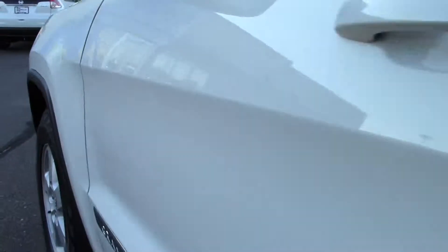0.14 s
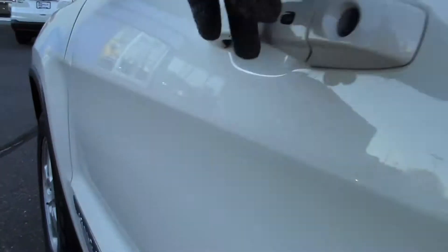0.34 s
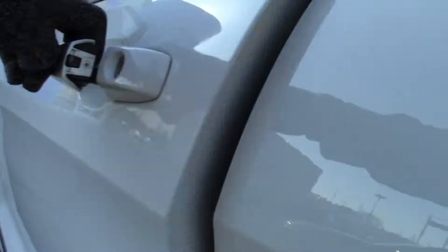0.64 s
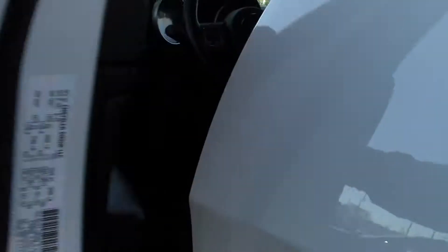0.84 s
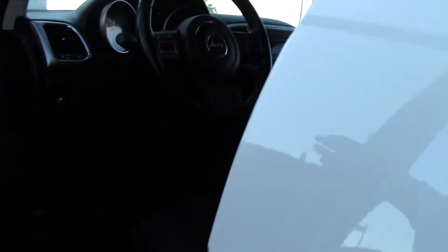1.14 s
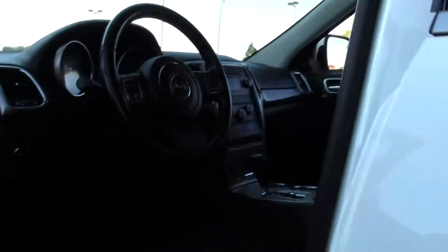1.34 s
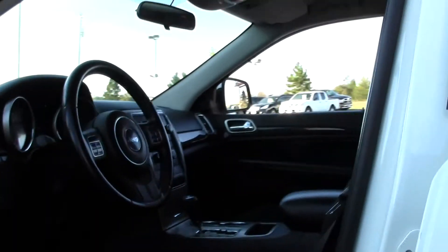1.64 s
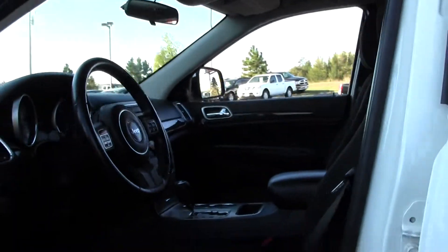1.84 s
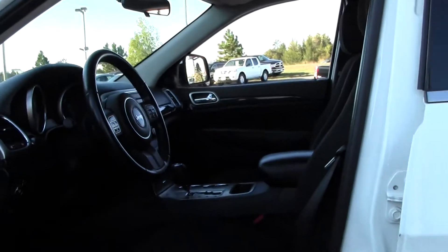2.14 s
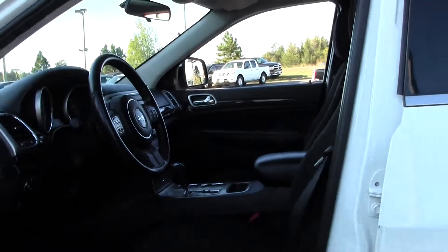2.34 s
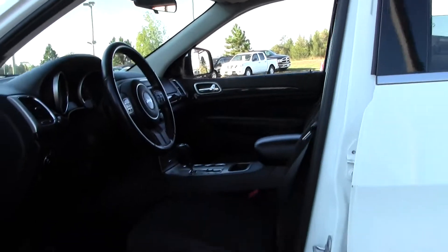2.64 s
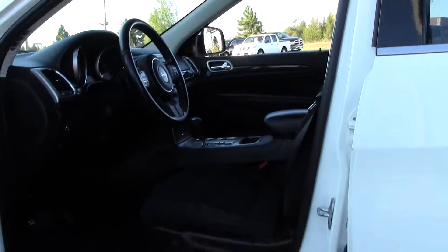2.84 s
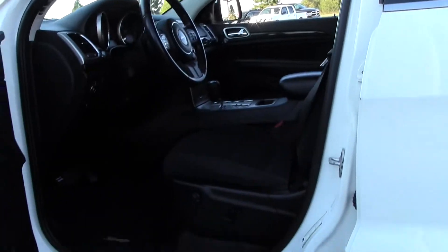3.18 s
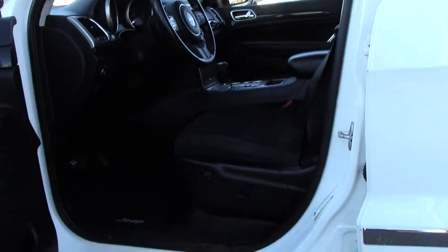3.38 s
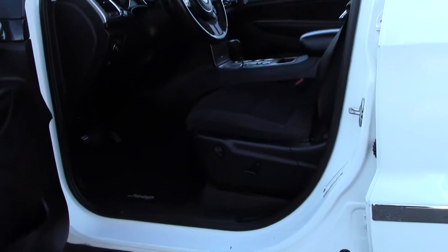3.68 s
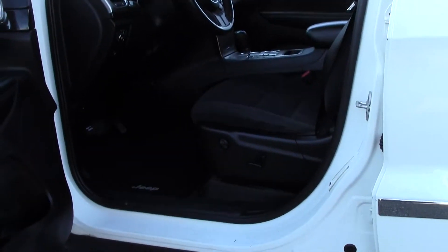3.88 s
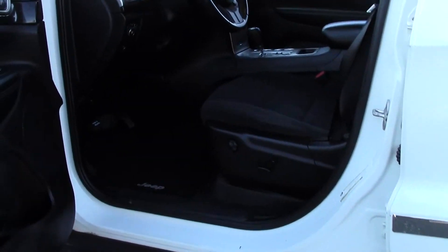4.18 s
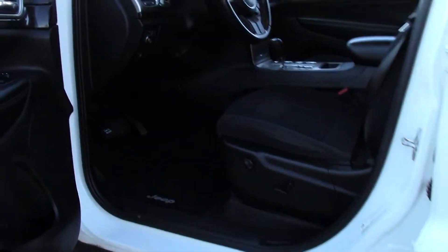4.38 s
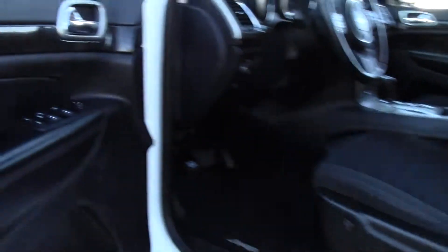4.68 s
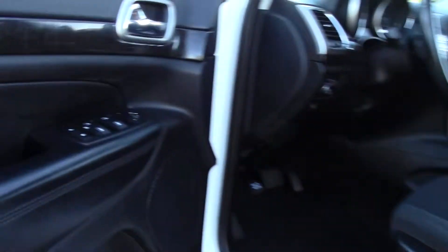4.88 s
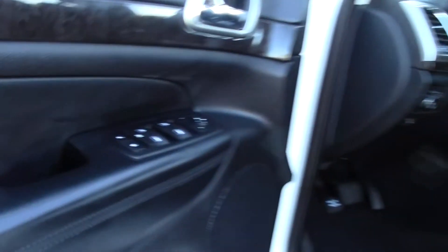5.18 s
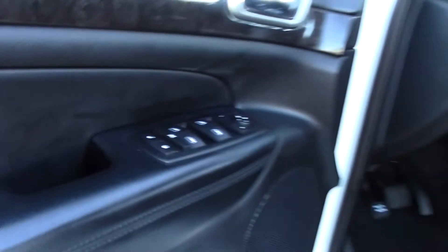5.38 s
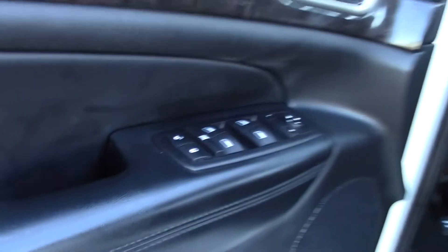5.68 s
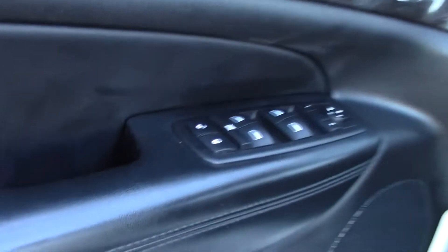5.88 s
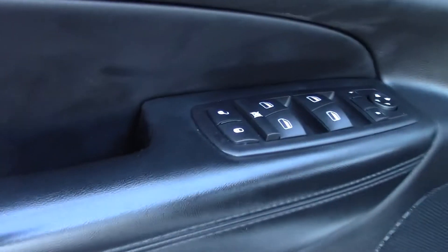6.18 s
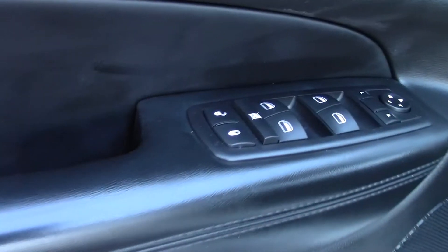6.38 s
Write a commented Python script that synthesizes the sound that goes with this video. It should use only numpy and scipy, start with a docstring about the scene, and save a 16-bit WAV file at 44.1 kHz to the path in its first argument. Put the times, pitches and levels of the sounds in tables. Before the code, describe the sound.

Close car door opening: handle clunk, latch pop and hollow panel thud, then small ticks under rumbling gusts and faint distant road drone.

```python
"""A car door is opened outdoors, close by, in gusts that buffet the microphone from start to end, strongest late on.
First the handle is pulled: its linkage clacks and snaps back as blows that excite damped modes. A second into
the scene the latch lets go and the door panel booms, again by modes over a dense clatter. Small parts tick as
damped notes with spits of noise; a sleeve brushes as grainy band noise. Near the end a far car's firing note falls.
Throughout, a road drones far away (coloured noise), a low hum wavers (three tones) and the two channels hiss."""
import sys
import numpy as np
from scipy import signal
from scipy.fft import rfft, irfft, next_fast_len
from scipy.io import wavfile
from scipy.ndimage import uniform_filter1d, map_coordinates

SR = 44100
rng = np.random.default_rng(int(sys.argv[2]) if len(sys.argv) > 2 else 0)


def dump_mix(stems):
    """Bounce the given channels to the path in sys.argv[1] as a 16-bit WAV at rate SR."""
    frames = np.atleast_2d(stems).T  # one column per channel
    limited = np.clip(frames, -1, 1)  # hard clip at full scale
    pcm = np.round(limited * 32767).astype(np.int16)
    wavfile.write(sys.argv[1], SR, pcm)


N = 287576


def amp(db):
    """Level in decibels to amplitude ratio: 20 dB per factor of ten."""
    return 10 ** (np.asarray(db) / 20)


def unit(x):
    """Normalisation to an rms of 1."""
    return x / np.sqrt(np.mean(x ** 2) + 1e-20)


def along(points, hz, order=1):
    """Interpolation of one column of (frequency, value, ..) points on a logarithmic frequency axis."""
    cols = np.transpose(points)
    return np.interp(np.log(hz + 1), np.log(cols[0] + 1), cols[order])


def curves(rows):
    """Linear interpolation in time: one value per sample for each column after the time."""
    s, *cols = np.transpose(rows)
    return [np.interp(np.arange(N) / SR, s, c) for c in cols]


def wobble(rate):
    """Slow random modulation: a smooth spline through random knots, rate of them per second."""
    knots = rng.standard_normal(int(N * rate / SR) + 4)
    return map_coordinates(knots, [np.arange(N) * rate / SR])


def filtered(x, response):
    """Linear filtering: the spectrum of x is multiplied by a response of frequency."""
    m = next_fast_len(x.shape[-1] + 8192)  # padding keeps the filter's tail from wrapping round
    spectrum = rfft(x, m) * response(np.fft.rfftfreq(m, 1 / SR))
    return irfft(spectrum, m)[..., :x.shape[-1]]


def noise(spectrum, channels=1):
    """Coloured noise of rms 1: white noise shaped by a spectral density."""
    white = rng.standard_normal((channels, N))
    return unit(filtered(white, lambda hz: amp(along(spectrum, hz))))


def bell(f, hz, spread):
    """Band-pass response: a Gaussian in log frequency around hz."""
    return np.exp(-(np.log((f + 1) / hz) / spread) ** 2)


def add(track, s, sound):
    """Superposition: mixes a sound into the track at time s."""
    part = track[round(s * SR):][:len(sound)]
    part += sound[:len(part)]


def door():
    """Impact excitation of two resonators: the handle with its rods, then the latch and the panel."""
    # blows: start_s, level_db, centre_hz driven most, width_octaves of that drive
    pulls = [(.345, -42.5, 500, 1.2), (.531, -35.5, 780, 0.67), (.567, -32, 586, 0.55),
             (.578, -33.5, 350, 0.98), (.6225, -26, 2190, 1.6), (.6265, -21, 450, 1.1),
             (.632, -20, 430, 1.3), (.646, -35.5, 600, 1.6), (.6645, -34, 1990, 1.4),
             (.680, -46, 2000, 0.46), (.690, -36.5, 397, 1.5), (.703, -38.5, 2200, 2.4),
             (.709, -45, 1500, 2.2)]
    release = [(1.0625, -39.5, 1510, 2.4), (1.069, -26.5, 1620, 1.4), (1.0765, -19.5, 1370, 1.9),
               (1.084, -28.5, 910, 2.7), (1.092, -26, 497, 1.8), (1.096, -30, 900, 0.85),
               (1.105, -28, 300, 0.65), (1.113, -36, 600, 1.2), (1.1355, -32, 296, 1.54),
               (1.166, -43.5, 1350, .6), (1.186, -38.5, 500, 1.3), (1.532, -39, 1520, 0.43)]
    # modes: frequency_hz, level_db at full drive, free_t60_s
    handle_modes = [(259, -1, 0.14), (338, -1.5, 0.076), (420, -3.5, 0.15), (617, -10, 0.2),
                    (757, 3, 0.031), (895, -7, 0.099), (1100, -10, 0.059), (1360, -28, 0.034),
                    (1890, -2, 0.092), (2140, -7, 0.074), (2950, -10, 0.042), (3320, -21, .05),
                    (4050, -14.5, 0.062), (5200, -34, 0.028)]
    panel_modes = [(116, 0.5, 0.36), (180, 5, 0.15), (259, -20, 0.12), (323, -11.5, 0.25), (382, -3, 0.13),
                   (509, -0.5, 0.058), (574, -29, 0.14), (706, -16.5, 0.013), (792, -5.5, 0.15),
                   (920, -7, 0.08), (1150, -17, 0.1), (1340, -12.5, 0.1), (1460, -8, 0.039),
                   (1840, -11.5, 0.12), (1880, -48, 0.22), (2220, -18, 0.085), (2420, -31, 0.11),
                   (3110, -16, 0.058), (3330, -22, 0.07), (4040, -12, 0.059), (5130, -21, 0.045)]
    return struck(pulls, handle_modes, clatter_db=7.5) + struck(release, panel_modes, clatter_db=10)


def struck(blows, modes, clatter_db):
    """Modal synthesis: each blow rings the modes near its drive, at slightly new strengths, over dense clatter."""
    ring_share = 0.57  # share of the free ring time that a 500 Hz blow leaves
    bright_shortens = 0.22  # power by which that share falls with the blow's frequency
    rise_s = 0.00023
    out, t = np.zeros(N), np.arange(SR // 3) / SR
    hz, level_db, t60 = np.transpose(modes)[:, :, None]
    sign = (-1) ** np.arange(len(hz))[:, None]  # neighbouring modes start in opposite directions
    for s, db, centre_hz, octaves in blows:
        share = ring_share * (500 / centre_hz) ** bright_shortens

        def drive_db(f):
            distance = np.log2((f + 20) / centre_hz) / octaves
            return np.maximum(-6 * distance ** 2, -40)

        strength_db = level_db + drive_db(hz) + 0.75 * rng.standard_normal(hz.shape)
        decay = amp(strength_db - 60 * t / (share * t60))
        ring = np.sum(decay * np.sin(2 * np.pi * hz * t) * sign, axis=0)
        dense = filtered(clatter(len(t), share), lambda f: amp(drive_db(f)))
        add(out, s, amp(db) * (ring + amp(clatter_db) * dense) * (1 - np.exp(-t / rise_s)))
    return out


def clatter(length, share):
    """Statistical mode density: countless small modes act as noise of which every band dies at its own speed."""
    # density of the small modes: frequency_hz, level_db_per_hz, free_t60_s
    dense_modes = [(100, -7, 0.098), (482, 4, 0.26), (1580, -4, 0.16), (4070, -18.5, 0.22),
                   (8850, -22, 0.13), (15800, -58, 0.032)]
    hz, t, z = signal.stft(rng.standard_normal(length), SR, nperseg=128)
    t60 = share * along(dense_modes, hz, order=2)[:, None]
    fading_db = along(dense_modes, hz)[:, None] - 60 * t / t60
    return signal.istft(z * amp(fading_db), SR, nperseg=128)[1][:length]


def ticks():
    """Damped oscillation: loose parts tick and tap, each a short decaying note with a spit of noise."""
    # ticks and taps: start_s, level_db, pitch_hz, spread of the spit (natural log of frequency)
    tick_rows = [(.751, -55, 5930, .27), (.867, -43.5, 2760, 0.41), (1.268, -44, 2290, .3),
                 (1.350, -54, 3300, .27), (1.376, -36.5, 900, 1.26), (1.445, -31.5, 420, 0.67),
                 (1.483, -53, 5200, .5), (1.532, -34, 4520, 0.27), (1.54, -35, 3470, 0.91),
                 (1.876, -36, 800, .7), (2.478, -44.5, 3200, .6), (3.019, -34, 650, 0.55),
                 (4.787, -53, 4500, .3)]
    tick_t60_s, dull_lengthens = 0.012, 0.25  # ring time at 3000 Hz; power of its rise as pitch falls
    tone_spread = 0.34  # note strength is 1 at this spread, less for wider spits
    rise_s = 0.00036
    out, t = np.zeros(N), np.arange(SR // 10) / SR
    for s, db, hz, spread in tick_rows:
        white = rng.standard_normal(len(t))
        spit = filtered(white, lambda f: bell(f, hz, spread) * np.sqrt(hz / (f + 1)))
        note = tone_spread / spread * np.sin(2 * np.pi * hz * t)
        t60 = tick_t60_s * (3000 / hz) ** dull_lengthens
        envelope = amp(db - 60 * t / t60) * (1 - np.exp(-t / rise_s))
        add(out, s, envelope * (note + 0.7 * unit(spit)))
    return out


def brushes():
    """Friction noise: cloth drags, as grainy band noise under a bell-shaped stroke."""
    # strokes of cloth: centre_s, half_length_s (to 1/e), level_db (rms before the bell), centre_hz
    strokes = [(1.179, 0.011, -52, 1160), (1.18, .015, -64, 3950), (1.224, 0.013, -60, 2500),
               (1.69, 0.063, -65, 3450), (1.783, .03, -58, 1170), (2.163, 0.02, -56.5, 960),
               (2.37, 0.042, -64.5, 3340), (2.628, 0.014, -60, 2000), (2.73, 0.023, -59.5, 1500)]
    out, t = np.zeros(N), np.arange(N) / SR
    for s, half, db, hz in strokes:
        grains = rng.standard_normal(N) * amp(4.3 * wobble(360))
        band = filtered(grains, lambda f: bell(f, hz, 0.56))
        out += amp(db) * unit(band) * np.exp(-((t - s) / half) ** 2)
    return out


def wind():
    """Turbulent pressure on the microphone: big slow eddies thud, small fast ones flutter and ripple, in lumps."""
    # course of the gusts: time_s, gust_db (strength), buffet_db (slow buffeting)
    gust_course = [(0, -44, -36.5), (.2, -48.5, -36), (.35, -45, -38.5), (.5, -40.5, -28), (.8, -40.5, -42),
                   (1.05, -49, -43), (1.4, -49.5, -46.5), (1.72, -46, -47), (1.9, -42.5, -37),
                   (2.05, -40.5, -29), (2.33, -41.5, -34.5), (2.49, -26, -33.5), (2.67, -39, -41),
                   (2.9, -33, -30), (3.05, -38.5, -43.5), (3.22, -35.5, -32), (3.4, -39.5, -39.5),
                   (3.75, -34, -32), (4.07, -40.5, -32), (4.22, -32, -45), (4.43, -21.5, -31),
                   (4.58, -28, -25.5), (4.69, -22, -43), (4.8, -29, -22.5), (4.97, -32.5, -33),
                   (5.25, -51, -34), (5.4, -52.5, -52), (5.6, -47, -70), (5.84, -48.5, -37.5),
                   (6.3, -47.5, -54.5), (6.52, -47, -40)]
    # relative spectra of the three eddy sizes: frequency_hz, level_db_per_hz
    buffet_spectrum = [(10, 17.5), (22, 19.5), (40, 20.5), (55, 17), (85, -3.5), (130, -56), (400, -120)]
    flutter_spectrum = [(35, 3), (65, 5.5), (100, 4), (150, -5), (220, -24), (400, -51), (1500, -120)]
    ripple_spectrum = [(90, -20.5), (170, 5.5), (250, -2.5), (350, -8), (500, -15), (800, -29),
                       (3000, -120)]
    gust_db, buffet_db = curves(gust_course)
    eddy = wobble(17)  # shared, so the three layers swell together
    buffet = unit(amp(0.86 * eddy + 0.83 * wobble(8.9)) * noise(buffet_spectrum))
    flutter = unit(amp(1.24 * eddy + 0.32 * wobble(30) + 1.03 * wobble(20)) * noise(flutter_spectrum))
    ripple = unit(amp(1.47 * eddy + 3.1 * wobble(40)) * noise(ripple_spectrum))
    # -47.5 dB at a gust strength of -33.5 dB, growing 1.154 dB per dB of strength
    ripple_db = -47.5 + 1.154 * (gust_db + 33.5)
    return amp(buffet_db) * buffet + amp(gust_db) * flutter + amp(ripple_db) * ripple


def road():
    """Broadband rolling noise: far tyres make a drone with drifting patches of colour."""
    # course of the drone: time_s, level_db
    road_course = [(0, -51.5), (.35, -55.5), (1.2, -50.5), (2.1, -55.5), (2.65, -52.5), (3.4, -55),
                   (4.4, -53.5), (5.3, -56), (5.7, -54.5), (6.52, -56.5)]
    # relative spectrum of the tyres: frequency_hz, level_db_per_hz
    tyre_spectrum = [(100, -6.5), (200, 3.5), (350, -1), (550, -1), (800, 0), (1200, -3.5), (1700, -9.5),
                     (2500, -17.5), (4000, -24.5), (8000, -40.5), (16000, -56)]
    z = signal.stft(noise(tyre_spectrum)[0], nperseg=1024)[2]
    field = rng.standard_normal(z.shape)
    for axis in (0, 1):  # smooth over frequency, then over time
        field = uniform_filter1d(field, size=8, axis=axis)
    drone = signal.istft(z * amp(1.72 * unit(field)), nperseg=1024)[1][:N]
    return amp(curves(road_course)[0] + 0.95 * wobble(11)) * unit(drone)


def hum():
    """Sinusoids with random amplitude and phase modulation: three low tones and a far car's firing note."""
    # tones: frequency_hz, level_db relative to the hum level
    hum_tones = [(59, -2), (119, -11), (178, -15.5)]
    # course of the hum: time_s, level_db (rms of a tone at 0 dB)
    hum_course = [(0, -50), (.5, -47), (1, -45.5), (1.5, -46.5), (3, -46.5), (4, -45), (5.6, -46),
                  (5.9, -58), (6.52, -49.5)]
    # a far car slows: time_s, pitch_hz, level_db (rms)
    engine_course = [(5.1, 130, -100), (5.4, 126.9, -54), (5.8, 118.4, -52), (6.2, 103.8, -63),
                     (6.52, 95, -64)]
    t = np.arange(N) / SR
    tones = np.zeros(N)
    for hz, db in hum_tones:
        tones += amp(db + 2.15 * wobble(4.1)) * np.sin(2 * np.pi * hz * t + 0.86 * wobble(6.5))
    hz, db = curves(engine_course)
    phase = 2 * np.pi * np.cumsum(hz) / SR + 1.3 * wobble(7)
    firing = amp(db + 0.76 * wobble(9.0)) * np.sin(phase)
    return np.sqrt(2) * (amp(curves(hum_course)[0]) * tones + firing)  # rms to peak


def scene():
    """Superposition of all sources, which reach both channels alike."""
    mono = wind() + road() + hum() + door() + ticks() + brushes()
    return np.repeat(mono, 2, axis=0)


def record(dry):
    """Amplifier hiss, a little stronger between the channels than in their sum; nothing from the band limit up."""
    # relative spectrum of the hiss: frequency_hz, level_db_per_hz
    hiss_spectrum = [(12, -37), (20, -14), (49, -39), (98, -15), (144, -14), (207, -4.5), (478, -3.5),
                     (811, -7.5), (6020, -9), (15500, -14)]
    top_hz = 15690
    common, apart = amp(-64) * noise(hiss_spectrum, channels=2) * amp([[0], [0.7]])
    return filtered(dry + [common + apart, common - apart], lambda hz: hz < top_hz)


dry = scene()
out = record(dry)
dump_mix(out)
```